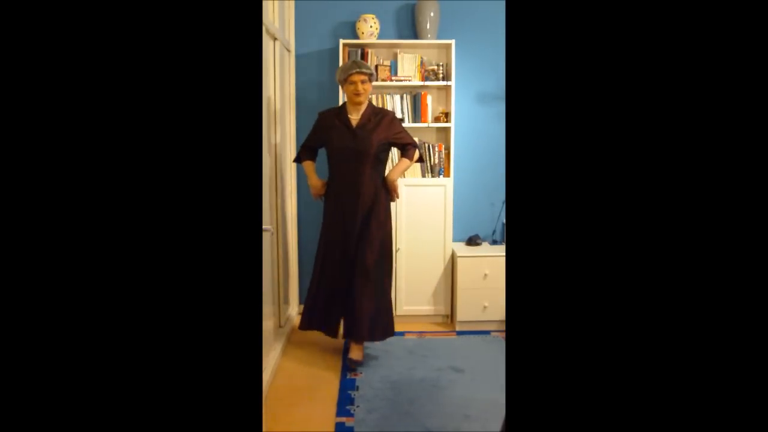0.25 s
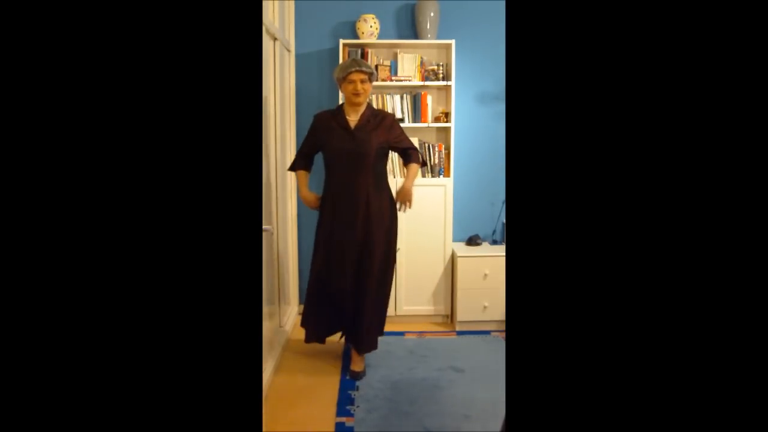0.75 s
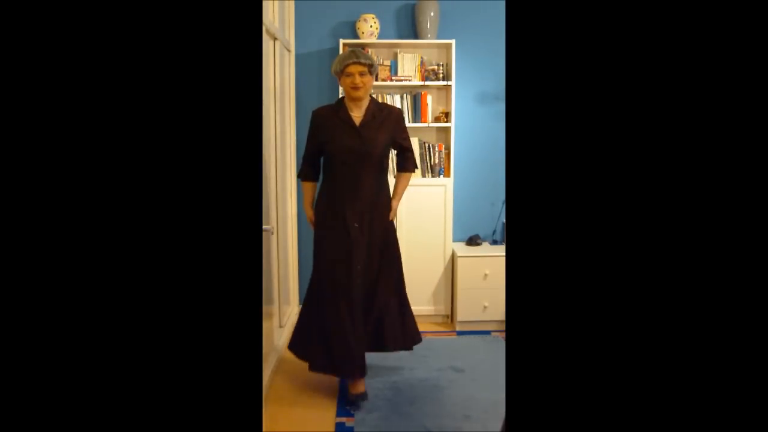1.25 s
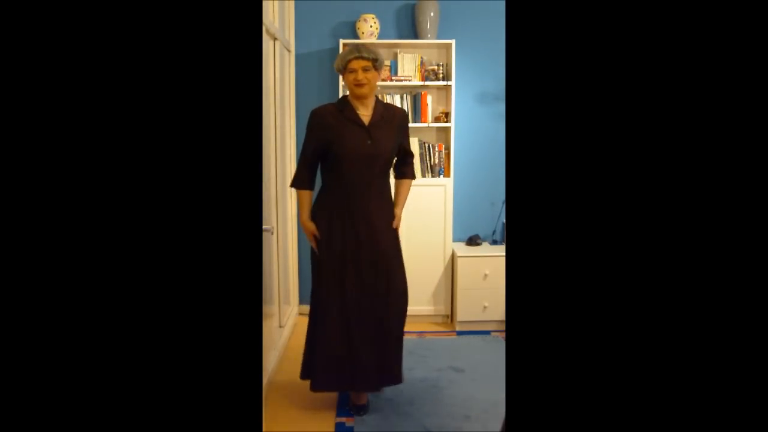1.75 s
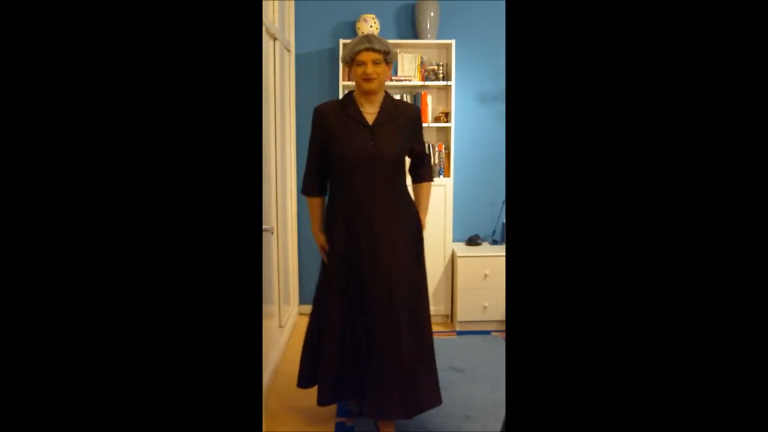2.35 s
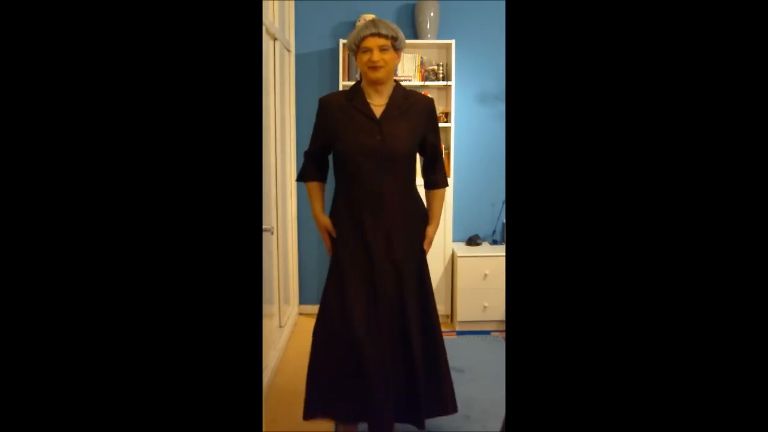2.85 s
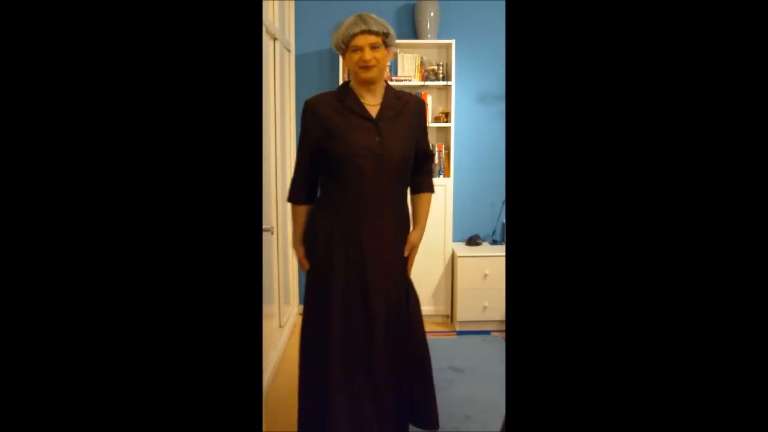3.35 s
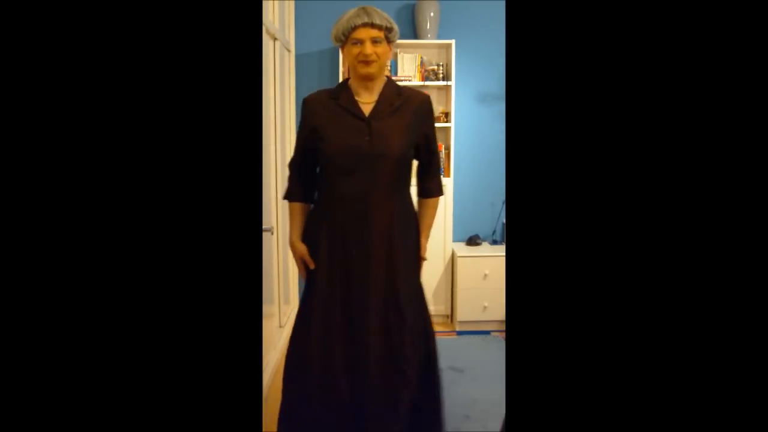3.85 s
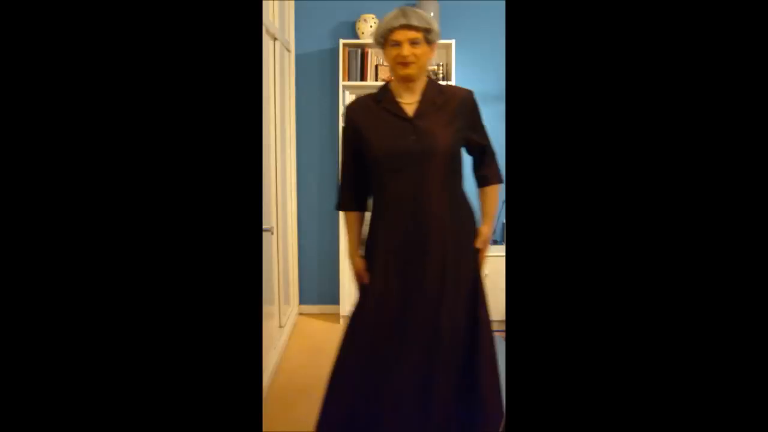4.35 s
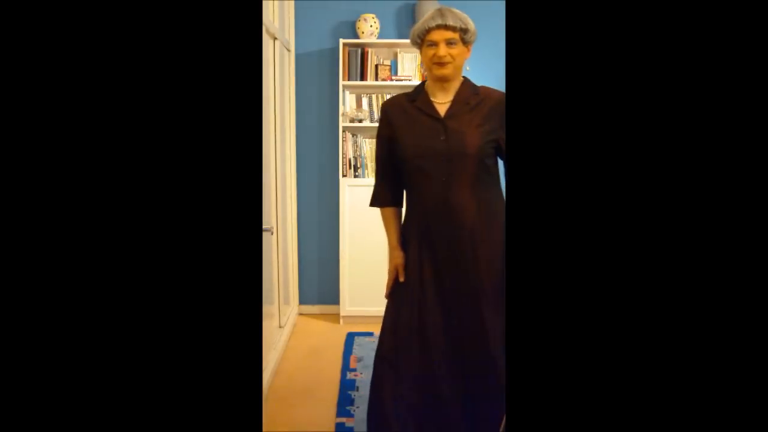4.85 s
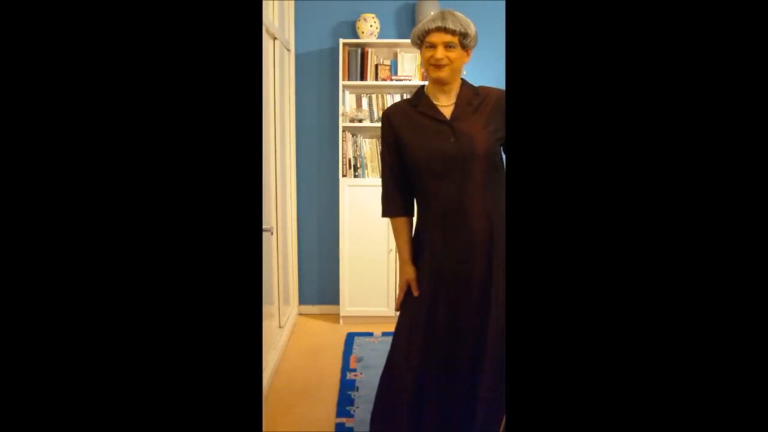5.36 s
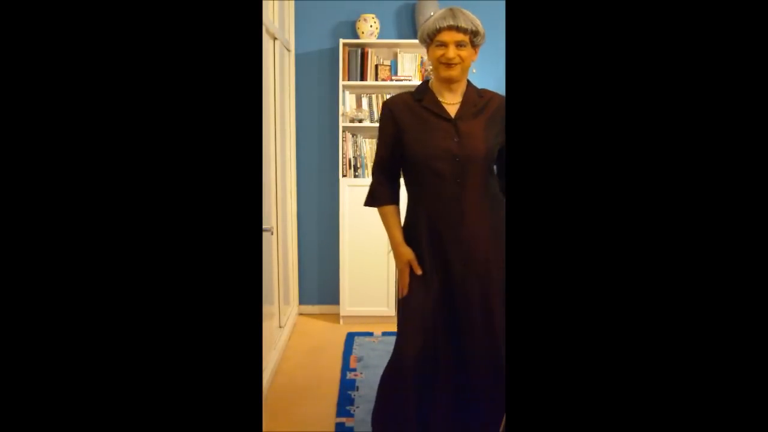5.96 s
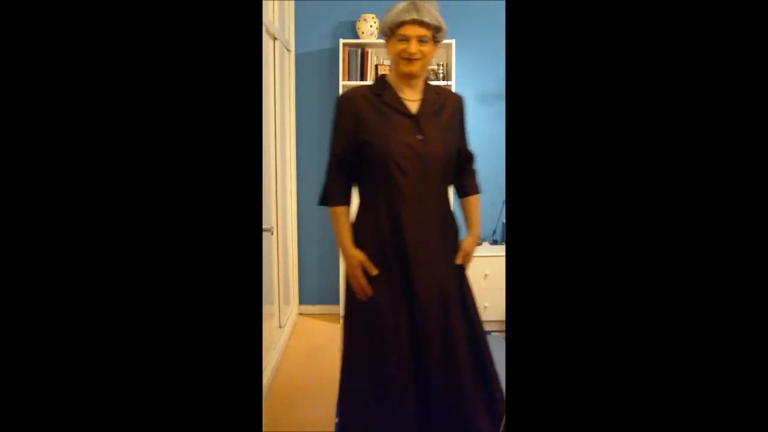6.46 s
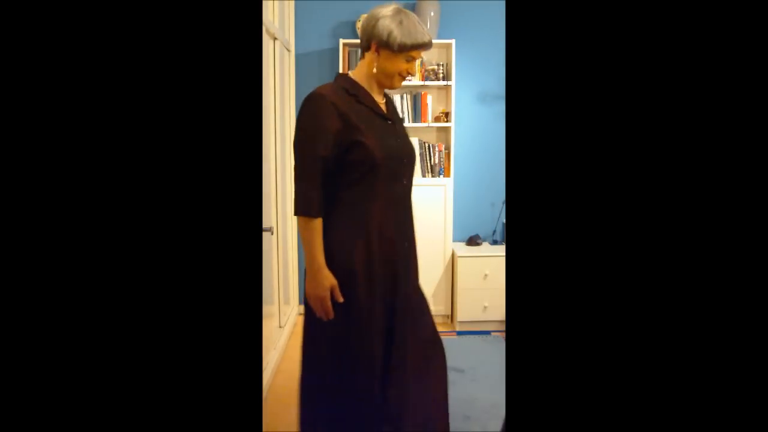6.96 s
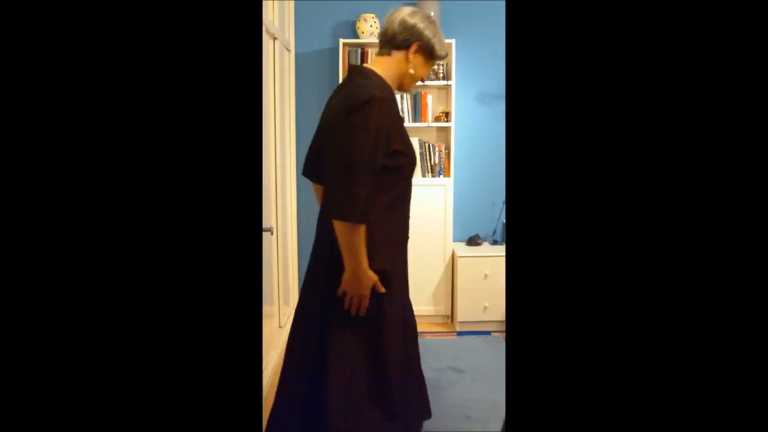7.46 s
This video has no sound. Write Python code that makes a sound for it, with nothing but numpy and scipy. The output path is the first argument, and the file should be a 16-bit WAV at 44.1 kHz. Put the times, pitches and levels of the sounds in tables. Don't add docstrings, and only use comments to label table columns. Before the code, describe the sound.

Crisp fabric swishing swells and fades with a walker's movements in a small furnished room, over faint hiss, with sparse sharp heel knocks.

```python
import sys
import numpy as np
from scipy import signal
from scipy.io import wavfile
from scipy.ndimage import uniform_filter1d

SR = 44100
rng = np.random.default_rng(int(sys.argv[2]) if len(sys.argv) > 2 else 0)


def inscribe(sig):
    pcm = np.round(np.clip(np.atleast_2d(sig).T, -1, 1) * 32767)
    wavfile.write(sys.argv[1], SR, pcm.astype(np.int16))


def ratio_of_db(decibels):
    return 10 ** (np.asarray(decibels, float) / 20)


N = 340011

LAYER_HZ = [1000, 2900, 6200, 9500]
# f/Hz, level/dB per Hz
CLOTH_SPECTRUM = [(88, -57), (150, -36), (393, -24.5), (578, -10.5), (954, -5), (2400, -0.5), (2970, -2),
                  (4050, -0.5), (5720, -1.5), (7940, -4.5), (9090, -1), (11500, -1), (15000, -7.5)]
# t/s of loudest
# moment, rise/s, fall/s, swish level/dB, folds relative to swish/dB
SWINGS = [(0.348, 0.041, 0.11, -51, -11), (0.613, 0.14, 0.308, -49.0, -5), (1.324, 0.3, 0.176, -48, -5.5),
          (1.458, 0.025, 0.19, -48.5, -6.5), (1.838, 0.32, 0.12, -46.0, -5),
          (2.422, 0.43, 0.283, -45.5, -7), (2.747, 0.11, 0.17, -47.5, -4.5),
          (3.012, 0.13, 0.39, -45.0, -5.5), (3.172, 0.025, 0.052, -48, -3), (3.343, 0.014, 0.23, -44, -4.5),
          (3.473, 0.041, 0.35, -44.5, -7.5), (3.7, 0.099, 0.09, -47.5, -5.5),
          (4.313, 0.76, 0.5, -49.5, -7.5), (4.63, 0.12, 0.076, -50, -8), (4.745, 0.054, 0.41, -47, -10.5),
          (5.332, 0.23, 0.078, -47.5, -11.5), (5.688, 0.29, 0.24, -47, -9.5),
          (6.051, 0.17, 0.026, -49.5, -7.5), (6.19, 0.18, 0.12, -45.5, -6),
          (6.322, 0.075, 0.52, -47.0, -6.5), (6.7, 0.026, 0.048, -52.5, -3),
          (6.839, 0.092, 0.16, -50.5, -9), (7.146, 0.22, 0.29, -49, -5), (7.537, 0.25, 0.25, -46.5, -6)]
# t/s of fastest brush, rise/s, fall/s, fizz level/dB
BRUSHES = [(0.161, 0.246, 0.033, -52.5), (0.345, 0.03, 0.09, -50.5), (0.551, 0.21, 0.094, -50),
           (0.714, 0.161, 0.2, -47), (0.982, 0.106, 0.46, -50.5), (1.303, 0.23, 0.25, -43.0),
           (1.808, 0.29, 0.17, -40), (2.24, 0.035, 0.08, -49), (2.421, 0.4, 0.19, -40.0),
           (2.776, 0.19, 0.11, -41.5), (3.084, 0.19, 0.18, -38.5), (3.345, 0.017, 0.044, -43),
           (3.445, 0.11, 0.365, -37), (3.53, 0.05, 0.045, -42.0), (4.13, 0.56, 0.099, -48.5),
           (4.393, 0.22, 0.18, -43), (4.638, 0.082, 0.36, -40.5), (4.843, 0.03, 0.37, -43.5),
           (5.326, 0.21, 0.083, -41), (5.527, 0.13, 0.4, -41), (5.876, 0.032, 0.45, -48.5),
           (6.141, 0.036, 0.1, -40), (6.342, 0.28, 0.035, -39.5), (6.394, 0.047, 0.43, -43),
           (6.49, 0.05, 0.05, -43.5), (6.832, 0.041, 0.11, -44), (7.14, 0.036, 0.052, -49),
           (7.168, 0.22, 0.62, -45.5), (7.534, 0.15, 0.056, -39.5), (7.687, 0.29, 0.045, -43)]
# t/s, length/s, f/Hz,
# width/Hz, level/dB
STEADY_STROKES = [(.54, .08, 2280, 400, -54), (3.395, .3, 4050, 160, -47.5), (3.406, 0.12, 2320, 500, -47),
                  (4.2, 0.18, 12700, 3000, -55), (4.62, 0.2, 2180, 250, -60),
                  (5.144, 0.15, 2500, 60, -53.5), (5.255, 0.12, 2460, 70, -55.5),
                  (5.276, 0.09, 5800, 700, -46), (5.26, 0.069, 9200, 900, -56),
                  (5.405, 0.18, 12200, 2200, -48), (5.58, 0.28, 2250, 250, -57),
                  (6.1, .5, 11900, 3000, -49.5), (6.132, .073, 2160, 400, -49),
                  (6.29, .05, 5100, 1600, -47)]
# t/s, length/s, start f/Hz, end f/Hz, level/dB
SLIDING_STROKES = [
    (0.504, 0.14, 700, 1340, -56.5),
    (0.637, 0.046, 2900, 2200, -49),
    (3.118, 0.13, 1350, 1200, -52.5),
]
# t/s, peak level/dB, dull share/1
KNOCKS = [(.33, -38, .1), (.505, -40, 1.1), (1.132, -37, .9), (3.1657, -28, .15), (3.1673, -25, .3),
          (3.188, -29, .1), (3.339, -22.5, .0), (3.3399, -25, .15), (3.344, -22.5, .2), (3.3463, -25, .1),
          (3.3487, -27, .2), (3.353, -29, .2), (6.018, -32, .5), (6.024, -34, .5), (6.6935, -30.5, .15),
          (6.697, -31, .2), (6.702, -33, .45), (6.707, -35, .2)]
# f/Hz, width/Hz, level/dB
HEEL_MODES = [(1000, 450, -7), (1550, 450, -5), (2450, 500, -1.5), (3400, 550, 1), (4400, 750, -1),
              (5500, 900, -3)]
# f/Hz, t60/s
ROOM_DECAY = [(300, 0.16), (2000, 0.2), (8000, 0.2), (15000, 0.22)]
# f/Hz, side minus mid level/dB
SIDE_MINUS_MID = [(60, -4), (120, -3), (240, -1), (480, -3.5), (950, -8), (1890, -10), (3770, -8.5),
                  (7520, -3), (15000, -1.5)]
# f/Hz, left minus right level/dB
LEFT_MINUS_RIGHT = [(60, 8), (240, -1.5), (950, 0.5), (3770, -0.5), (15000, -2)]
# f/Hz, level/dB per Hz
HISS_SPECTRUM = [(60, -55), (110, -45), (160, -27), (300, -15.5), (600, -6.5), (1200, -5), (2500, -2),
                 (7000, -5), (10000, -2), (15300, -9)]

CLOTH_DB, HISS_DB = 0.14, -48.5
SLIPS_PER_S, SLIP_SPREAD_DB = 14000, 2.0
EDGE_DB = -10
REST_SWISH_DB, REST_FOLDS_DB, REST_FIZZ_DB = -60, -58.5, -69
SETS_OFF_S = 0.92
WEAVE_FROM_SWING, WEAVE_DB = 0.44, -0.93
SLIDE_WIDTH = 0.31
NOTCH_HZ, NOTCH_WIDTH_HZ = 8002, 205
FRAME = 512


def dress():
    size = ratio_of_db(SLIP_SPREAD_DB * np.minimum(rng.exponential(1, (2, N)), 5))
    happens = rng.random((2, N)) < SLIPS_PER_S / SR
    slips = size * rng.standard_normal((2, N)) * happens
    blur = rng.standard_normal((2, N))
    return painted(evened(0.45 * evened(slips) + blur), cloth_field)


def cloth_field(hz, t):
    swish = movements(t, [row[:4] for row in SWINGS], REST_SWISH_DB)
    fold_rows = [(s, rise, fall, db + deep) for s, rise, fall, db, deep in SWINGS]
    folds = movements(t, fold_rows, REST_FOLDS_DB)
    fizz = movements(t, BRUSHES, REST_FIZZ_DB)
    weave = WEAVE_FROM_SWING * swish + (1 - WEAVE_FROM_SWING) * fizz + WEAVE_DB
    levels = np.array([folds, swish, weave, fizz])
    colour = read(CLOTH_SPECTRUM, hz)
    nearest = np.array([read(list(zip(LAYER_HZ, one)), hz) for one in np.eye(4)])
    usual_db = 10 * np.log10(nearest @ ratio_of_db(colour) ** 2 / (len(hz) - 1))
    moving = nearest.T @ (levels - usual_db[:, None])
    blotches = 0.84 * patches(moving.shape, 6, 30)
    flicker = 0.73 * patches(moving.shape, 83, 8)
    return colour[:, None] + moving + blotches + flicker + CLOTH_DB


def movements(t, rows, rest_db):
    top, rise, fall, db = np.transpose(rows)[:, :, None]
    before = (top - t) / np.maximum(rise, .01)
    after = (t - top) / np.maximum(fall, .01)
    away = np.where(t < top, before, after)
    power = ratio_of_db(db + EDGE_DB * away ** 2) ** 2
    rest = ratio_of_db(rest_db) ** 2 * np.minimum(0.18 + t / SETS_OFF_S, 1)
    return 10 * np.log10(power.sum(0) + rest)


def patches(shape, bins, frames):
    across_hz = uniform_filter1d(rng.standard_normal(shape), int(bins), 0)
    return evened(uniform_filter1d(across_hz, int(frames), 1))


def painted(mid_side, field_db):
    hz, t, z = signal.stft(mid_side, SR, nperseg=FRAME, noverlap=FRAME * 3 // 4)
    mid = z[0]
    side = z[1] * ratio_of_db(read(SIDE_MINUS_MID, hz))[:, None]
    lean = ratio_of_db(read(LEFT_MINUS_RIGHT, hz) / 2)[:, None]
    pair = np.array([(mid + side) * lean, (mid - side) / lean])
    pair = pair * ratio_of_db(field_db(hz, t))
    return signal.istft(pair, SR, nperseg=FRAME, noverlap=FRAME * 3 // 4)[1][:, :N]


def read(points, hz):
    f, value = np.transpose(points)
    return np.interp(np.log(hz + 1), np.log(f + 1), value)


def evened(x):
    return x / np.sqrt(np.mean(x ** 2) + 1e-20)


def strokes():
    out = np.zeros(N)
    noise = rng.standard_normal(N)
    noise *= ratio_of_db(1.2 * patches((1, N), 1, 600)[0])
    steady = [(s, length, hz, hz, width, db) for s, length, hz, width, db in STEADY_STROKES]
    sliding = [(s, length, a, b, SLIDE_WIDTH * a, db) for s, length, a, b, db in SLIDING_STROKES]
    for s, length, start_hz, end_hz, width, db in steady + sliding:
        at = slice(round(s * SR), round((s + length) * SR))
        glide = np.linspace(start_hz, end_hz, len(out[at]))
        tone = resonate(resonate(noise[at], glide, width), glide, width)
        out[at] += ratio_of_db(db) * evened(tone) * signal.windows.tukey(len(glide), .6)
    return out


def resonate(x, hz, width):
    turn = np.exp(2j * np.pi * np.cumsum(hz * np.ones(len(x))) / SR)
    r = np.exp(-np.pi * width / SR)
    return 2 * (turn * signal.lfilter([1 - r], [1, -r], x / turn)).real


def knocks():
    out, t = np.zeros(N), np.arange(900) / SR
    bass_cut = signal.butter(4, 560, "high", fs=SR, output="sos")
    grits = rng.standard_normal((len(KNOCKS), len(t)))
    for (s, db, dull), grit in zip(KNOCKS, grits):
        blow = (t == 0) + .12 * grit * np.exp(-t / .001)
        modes = np.zeros(len(t))
        for k, (hz, width, mode_db) in enumerate(HEEL_MODES):
            level = (-1) ** k * ratio_of_db(mode_db - 12 * dull * np.log2(hz / 2000))
            modes += level * np.exp(-np.pi * width * t) * np.sin(2 * np.pi * hz * t)
        ring = np.convolve(blow, modes)[:len(t)]
        ring = signal.sosfilt(bass_cut, ring)
        out[round(s * SR):][:len(t)] += ratio_of_db(db) * ring / abs(ring).max()
    return out


def room(x):
    taps = np.zeros((2, SR // 2))
    at = np.arange(80, SR // 2 - 20, 20) + rng.integers(0, 20, (2, (SR // 2 - 81) // 20))
    np.put_along_axis(taps, at, rng.choice([-1., 1.], at.shape), 1)
    hz, t, z = signal.stft(taps, SR, nperseg=256)
    decay = ratio_of_db(-60 * t / read(ROOM_DECAY, hz)[:, None])
    tail = signal.istft(z * decay, SR, nperseg=256)[1]
    tail = np.array([tail[0] + 0.12 * tail[1], tail[0] - 0.59 * tail[1]])
    return signal.fftconvolve(x[None], tail / np.linalg.norm(tail[0]), axes=1)[:, :N]


def hiss():
    flat = rng.standard_normal((2, N))
    coloured = painted(flat, lambda hz, t: read(HISS_SPECTRUM, hz)[:, None])
    return ratio_of_db(HISS_DB) * evened(coloured)


def scene():
    stroke, heel = strokes(), knocks()
    direct = dress() + stroke + heel
    echoes = ratio_of_db(-7.5) * room(stroke) + ratio_of_db(-5.0) * room(heel)
    return direct + echoes + hiss()


def top_cut(x):
    return signal.sosfilt(signal.butter(12, 15300, fs=SR, output="sos"), x)


def record(dry):
    x = signal.sosfilt(signal.butter(9, 128, "high", fs=SR, output="sos"), dry)
    x = signal.lfilter(*signal.iirnotch(NOTCH_HZ, NOTCH_HZ / NOTCH_WIDTH_HZ, SR), x)
    return top_cut(x)


dry = scene()
out = record(dry)
inscribe(out)
```